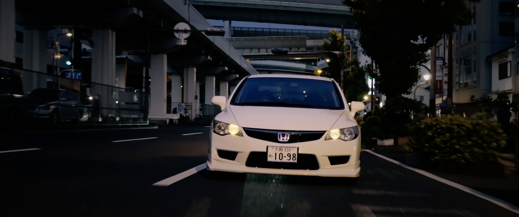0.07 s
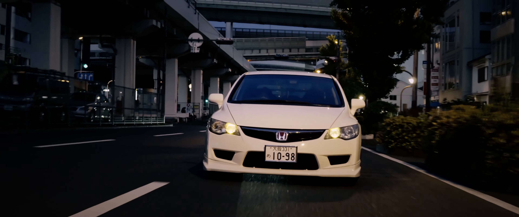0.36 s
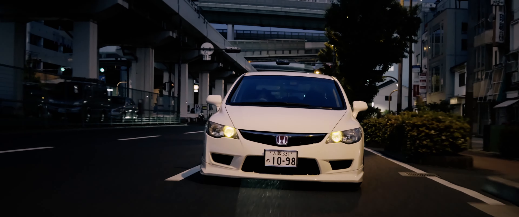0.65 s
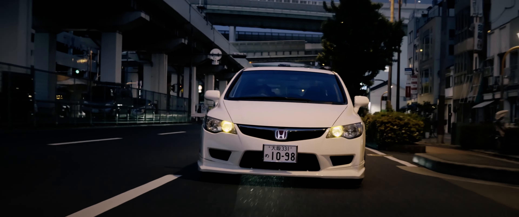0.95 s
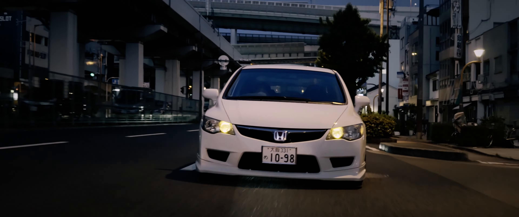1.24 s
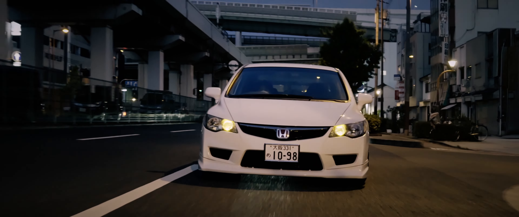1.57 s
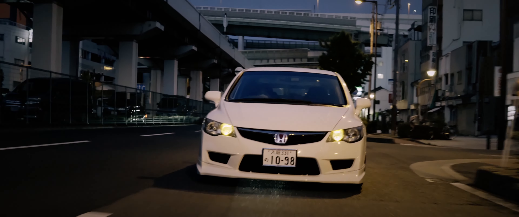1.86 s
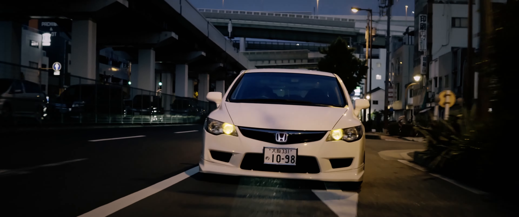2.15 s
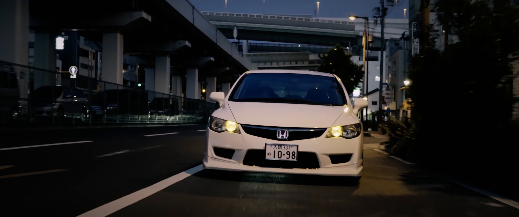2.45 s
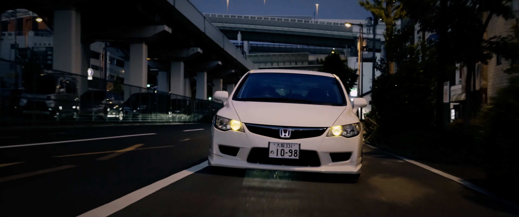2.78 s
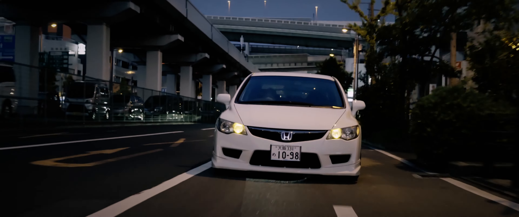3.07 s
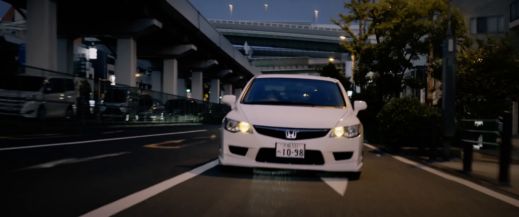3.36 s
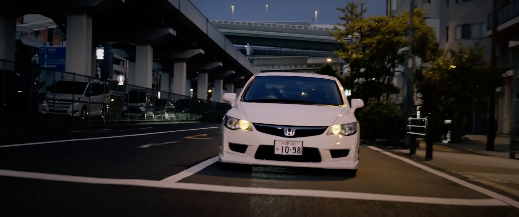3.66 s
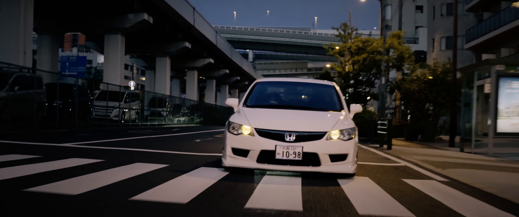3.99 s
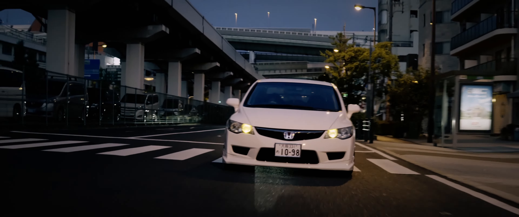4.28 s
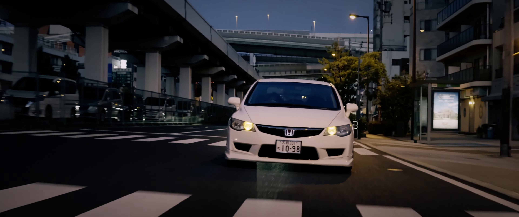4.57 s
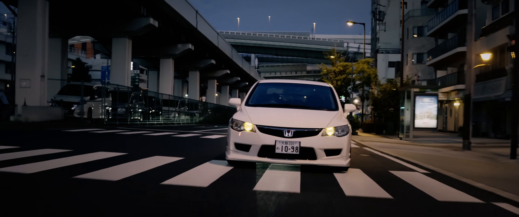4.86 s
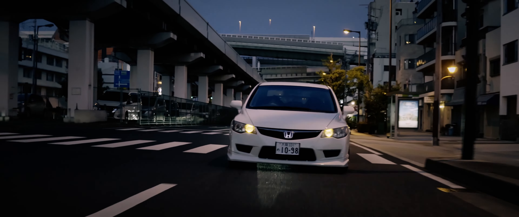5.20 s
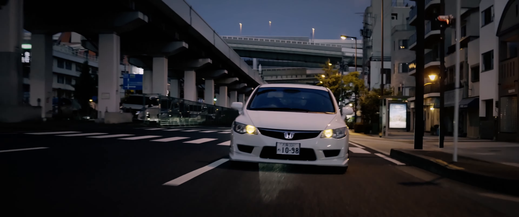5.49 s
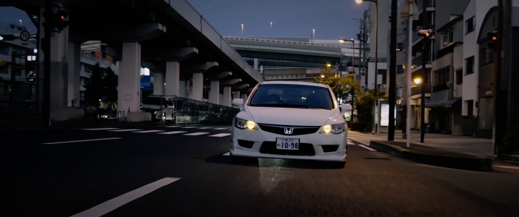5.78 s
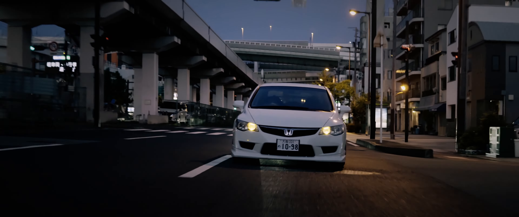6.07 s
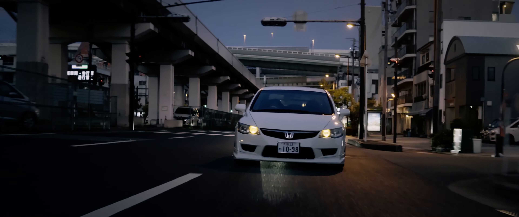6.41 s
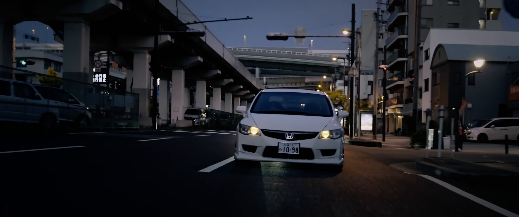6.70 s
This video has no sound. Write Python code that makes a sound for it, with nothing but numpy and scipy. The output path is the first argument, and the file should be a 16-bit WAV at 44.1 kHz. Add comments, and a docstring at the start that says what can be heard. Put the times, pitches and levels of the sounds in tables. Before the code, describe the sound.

Tyres roar dully on a city street while a car engine drones at high revs with whining gears, picked up inside the cabin. The driver lifts off and shifts up with a clack and a soft thud. The engine pulls again on a deeper, slightly raspy note before relaxing into a quieter cruise. A bump brings a deep thump, knocks and a brief rattle of trim, and the steady drone carries on.

```python
"""A four-cylinder engine booms at high revs under a gear whine, heard inside a sports car in the city.
It lifts off, shifts up, pulls again and settles to a cruise. Crank orders sweep through exhaust and
cabin resonances; gas noise puffs at each firing. The gear lever clacks, loose trim rattles and the
wheels thump over a bump. Tyre roar comes through the body throughout."""
import sys
import numpy as np
from scipy import signal
from scipy.fft import rfft, irfft, next_fast_len
from scipy.io import wavfile
from scipy.ndimage import map_coordinates

SR = 44100
rng = np.random.default_rng(int(sys.argv[2]) if len(sys.argv) > 2 else 0)


def output_pcm(signal):
    """Save a mono or channel-first signal as 16-bit PCM at the path in sys.argv[1].

    Samples are clipped to [-1, 1] before scaling.
    """
    pcm = np.clip(np.atleast_2d(signal).T, -1, 1) * 32767
    wavfile.write(sys.argv[1], SR, np.round(pcm).astype(np.int16))


N = 297234
TIME = np.arange(N) / SR

# high revs, sag with the clutch open, next gear, pull, cruise: t/s, crank speed/Hz
CRANK_SPEED = [(0, 112.0), (.64, 111.9), (.9, 109.2), (1.1, 105.5), (1.3, 99.4), (1.48, 97.3), (1.52, 75.5),
               (1.61, 87.5), (1.68, 82.3), (2.6, 88.4), (3.3, 90.0), (3.9, 90.1), (4.6, 88.6), (6.0, 87.8),
               (6.74, 88.4)]
# accelerator moves: t/s, load/dB, brightness/(dB/octave)
PEDAL_MOVES = [(0, -1.46, 0.1), (.57, -8, -0.5), (0.929, -7, -8), (1.27, -16.5, 1.5), (1.56, -1.1, .5),
               (2.1, -1, 3.5), (2.74, -7.5, 3.5), (3.08, -9, 1), (3.6, -13.5, -5.5), (4.85, -11.5, -5),
               (6.3, -8.5, 0.5)]
# exhaust and cabin response to one order at full load: f/Hz, level/dB
BOOM_RESPONSE = [(140, -37), (168, -31.5), (180, -24), (205, -20.5), (224, -15), (250, -15), (263, -22),
                 (295, -25), (335, -16), (352, -19.5), (366, -30), (394, -20.5), (416, -22), (438, -28),
                 (451, -27.5), (480, -31.5), (515, -37), (534, -26), (560, -36), (588, -31.5), (630, -45.5)]
# weaker response above the boom: f/Hz, level/dB
SNARL_RESPONSE = [(675, -46.5), (720, -54), (755, -42.5), (790, -57.5), (835, -53), (890, -49.5),
                  (930, -59), (970, -50.5), (1040, -62), (1190, -51.5), (1450, -74.5), (1630, -64.5),
                  (1900, -72.5), (2900, -81)]
# cabin standing waves: f/Hz, left minus right/dB, left lead/rad
STANDING_WAVES = [(90, -11, .1), (112, -3, .2), (175, -4, 0), (224, -1, .3), (252, -3, .2), (266, 4, -.6),
                  (330, -9, 1), (355, -5, .8), (420, -6, -.8), (438, -1, -1.6), (450, -10, -.6),
                  (530, -11, .2), (615, 4, -.5), (900, -1, .1)]
# combustion noise: f/Hz, relative density/dB
RASP_SPECTRUM = [(120, -24), (230, 3.5), (300, -4.5), (390, 9.5), (470, -11.5), (580, -3), (700, -20),
                 (1150, -17), (1500, -30), (2400, -37), (3300, -49.5), (4000, -51), (7500, -63.5),
                 (15000, -76.5)]
# gear mesh tones: crank order, relative level/dB
MESH_TONES = [(10, -48.5), (12, -61.5), (16, -71), (18, -59.5), (22, -75), (36, -83), (42, -88),
              (57, -87.5)]
# gear mesh hiss: f/Hz, relative density/dB
MESH_SPECTRUM = [(1200, -14), (2500, 4), (3300, -1.5), (4000, 3), (4600, -8.5), (6500, -14.5), (9000, -21)]
# swells of the whine: t/s, half length/s, lift/dB
WHINE_SWELLS = [(.19, 0.037, 6.5), (.5, .055, 8.5)]
# body jolts from the shift and the bump: t/s, level/dB, f/Hz, t60/s
BODY_JOLTS = [(1.013, -4.5, 219, 0.14), (1.312, -15, 198, 0.074), (4.349, -24, 45.2, 0.34),
              (4.462, -12, 62.6, 0.1), (4.513, 6, 73.4, 0.094)]
# bright clicks, loudest from the gear lever: t/s, level/dB, t60/s
CLICK_HITS = [(.9015, -54, 0.037), (.971, -53, 0.072), (1.02, -51.5, 0.092), (1.0375, -39.5, 0.085),
              (1.7506, -52, .025), (3.2023, -68, 0.04), (3.7884, -66, 0.069), (6.3162, -56, .06)]
# clicks: f/Hz, relative density/dB
CLICK_SPECTRUM = [(500, -3.5), (1800, 8), (3500, -4), (6000, -1), (9500, 0), (13000, -5.5), (16000, -10)]
# knocks through floor and lever housing: t/s, level/dB, t60/s
KNOCK_HITS = [(.972, -43, 0.14), (1.021, -38, 0.061), (4.33, -38, 0.19), (4.385, -35.5, .1),
              (4.475, -39.5, 0.29), (4.555, -33.5, 0.17)]
# knocks: f/Hz, relative density/dB
KNOCK_SPECTRUM = [(200, -9.5), (600, 9), (1150, 4), (1700, -18), (2600, -15), (5000, -49), (15000, -59.5)]
# trim shaken by shift and road: t/s, level/dB, t60/s
TRIM_HITS = [(.972, -48.5, 0.092), (1.021, -43, 0.11), (1.2921, -55, .1), (3.7884, -55, 0.062),
             (4.3272, -52.5, .16), (4.387, -40.5, 0.084), (4.467, -50.5, .25), (4.497, -51.5, 0.14),
             (4.555, -54.5, 0.2)]
# trim: f/Hz, relative density/dB
TRIM_SPECTRUM = [(300, -10.5), (1100, 5.5), (2000, 7), (3600, -1), (4900, -6.5), (6000, -13),
                 (11000, -15.5), (15000, -27.5)]
# tyre roar through the body: f/Hz, relative density/dB
TYRE_SPECTRUM = [(20, -21), (45, -14.5), (75, -10), (125, -20), (200, -8), (290, -16), (450, -21),
                 (590, -17), (690, -31.5), (1150, -32), (1500, -40), (2300, -45.5), (4500, -69.5),
                 (9000, -76), (15000, -88)]
# tyre cavity and cabin air modes: f/Hz, width/Hz, base lift/dB
AIR_MODES = [(180.9, 9.1, 5.5), (211.1, 52, 8), (353, 26, 3), (379, 63, 8), (496, 75, 1)]
# rough asphalt: t/s, half length/s, rumble lift/dB
ROUGH_PATCHES = [(3.38, .14, 6), (4.48, 0.21, 10)]
# cabin noise: f/Hz, left-right coherence
NOISE_COHERENCE = [(50, 0.72), (180, .8), (300, 0.44), (520, 0.3), (890, .8), (2600, 0.6), (10000, 0.76)]
# cabin noise: f/Hz, left minus right/dB
NOISE_BALANCE = [(30, 0.5), (70, -8), (140, -3.5), (210, -3), (400, -2), (740, -2), (3000, 1)]


def engine_orders(angle, lags, shake_db=-29, uneven_db=-19, count=44, decimation=7):
    """Half multiples of the crank speed sweep through exhaust and cabin resonances."""
    t, angle = TIME[::decimation], angle[::decimation]
    load_db, tilt_db_per_oct = pedal(t)
    speed_hz = crank_hz(t)
    out = np.zeros((2, len(t)))
    for half_orders in range(2, count + 1):
        order = half_orders / 2
        hz = order * speed_hz
        octaves = np.log2(hz / 300)
        db = at_hz(BOOM_RESPONSE + SNARL_RESPONSE, hz) + load_db
        db += tilt_db_per_oct * np.clip(octaves, -1, 1)
        if order == 1:  # crank imbalance, little load dependence
            db = shake_db + .35 * load_db
        if half_orders % 2:  # unequal cylinders
            db += np.minimum(uneven_db + 6 * octaves, 0)
        balance_db, lead_rad = at_hz(STANDING_WAVES, hz)
        pan = amp([balance_db, -balance_db]) ** .5
        pan /= np.linalg.norm(pan, axis=0)
        # firings vary, most at high orders and closed throttle
        roughness = .013 + .016 * order - .012 * load_db
        scatter = 1 + roughness * (wobble(28, t) + 1j * wobble(28, t))
        phase = order * angle + lags[half_orders] + np.outer([.5, -.5], lead_rad)
        out += 2 * amp(db) * pan * (scatter * np.exp(1j * phase)).real
    return signal.resample_poly(out, decimation, 1, axis=1, window="blackman")[:, :N]


def crank_hz(t=TIME):
    """Crank turns per second."""
    return np.interp(t, *np.transpose(CRANK_SPEED))


def crank_angle(waver=.00048):
    """Crank angle in rad; the speed is never quite steady."""
    return 2 * np.pi * np.cumsum(crank_hz() * (1 + waver * wobble(14))) / SR


def pedal(t=TIME, load_ramp_s=.1, bright_ramp_s=.22):
    """Load/dB and brightness/(dB/octave) ramp to each pedal position and hold."""
    start_s, load_db, tilt_db_per_oct = np.transpose(PEDAL_MOVES)

    def follow(targets, ramp_s):
        moves = zip(start_s[1:], np.diff(targets))
        return targets[0] + sum(step * np.clip((t - s) / ramp_s, 0, 1) for s, step in moves)
    return 20 * np.log10(follow(amp(load_db), load_ramp_s)), follow(tilt_db_per_oct, bright_ramp_s)


def engine_rasp(angle, level_db=-28, depth=.62, sputter_db=2):
    """Gas noise puffs twice a turn, unevenly, and grows with load."""
    speed_hz = crank_hz()
    load_db, tilt_db_per_oct = pedal()
    firing = (1 + depth * np.cos(2 * angle)) * amp(sputter_db * wobble(120))
    puffs = unit(firing * cabin_noise(RASP_SPECTRUM))
    lugging_db = -.15 * (speed_hz - np.mean(speed_hz))  # charges burn harder at low revs
    return amp(level_db + load_db + .5 * tilt_db_per_oct + lugging_db) * puffs


def lift_ring(angle, centre_s=2.82, half_s=.14, level_db=-46, order=10):
    """One high order rings briefly as the pedal eases after the pull."""
    return np.sqrt(2) * amp(level_db) * bell(centre_s, half_s) * np.cos(order * angle)


def gear_whine(angle, lags, level_db=-2.5, end_s=.54, fade_db_per_s=90, waver_db=2):
    """The lower gear's teeth sing and hiss until the throttle closes."""
    whine_db = level_db + humps_db(WHINE_SWELLS) - fade_db_per_s * np.maximum(TIME - end_s, 0)
    tones = sum(amp(db + waver_db * wobble(24)) * np.cos(order * angle + lags[2 * round(order)])
                for order, db in MESH_TONES)
    hiss = amp(-66 + np.minimum(whine_db, -2)) * cabin_noise(MESH_SPECTRUM)
    return np.sqrt(2) * amp(whine_db) * tones + hiss


def body_thumps(attack_s=.027):
    """Each jolt rings a low body mode, louder on the right."""
    out = np.zeros(N)
    for start_s, db, hz, t60_s in BODY_JOLTS:
        t = np.maximum(TIME - start_s, 0)
        envelope = amp(db - 60 * t / t60_s) * (1 - np.exp(-t / attack_s))
        out += envelope * np.sin(2 * np.pi * hz * t)
    return out * amp([[-2], [2]])


def contacts(hits, spectrum, grain_db, attack_s, tail_db, tail_t60_s=.29):
    """Parts collide: each hit is a fast-dying burst of noise with a faint tail."""
    envelope = np.zeros(N)
    t = TIME[:SR // 2]
    for start_s, db, t60_s in hits:
        span = envelope[round(start_s * SR):][:len(t)]
        decay = amp(-60 * t / t60_s) + amp(tail_db - 60 * t / tail_t60_s)
        burst = amp(db) * decay * (1 - np.exp(-t / attack_s))
        span += burst[:len(span)]
    chatter = unit(amp(grain_db * wobble(450)))
    return envelope * chatter * cabin_noise(spectrum)


def trim_rattle(rock_start_s=4.605, rock_period_s=.134):
    """Trim strikes when shaken, on each rock of the body after the bump, and faintly at random."""
    rocking = [(rock_start_s + k * rock_period_s, -58 - .5 * k, .12) for k in range(5)]
    stray = [(when * TIME[-1], -65 + 4 * size, .09) for when, size in rng.random((5, 2))]
    return contacts(TRIM_HITS + rocking + stray, TRIM_SPECTRUM, grain_db=0, attack_s=.00089, tail_db=-20)


def trim_buzz(centre_s=4.49, half_s=.15, level_db=-59, grain_db=3):
    """Trim buzzes while the wheels cross the bump."""
    buzz = unit(amp(grain_db * wobble(300)) * cabin_noise(TRIM_SPECTRUM))
    return amp(level_db) * bell(centre_s, half_s) * buzz


def loose_ticks(level_db=-71, spread_db=2.5, t60_s=.035, count=60):
    """Road vibration makes small parts tick at random."""
    times_s = rng.uniform(0, TIME[-1], count)
    sizes = np.clip(rng.standard_normal(count), -2, 2)
    hits = [(s, level_db + spread_db * size, t60_s) for s, size in zip(times_s, sizes)]
    spectrum = [(1000, -13.5), (4000, 0), (9000, -.5), (15000, -9.5)]  # f/Hz, relative density/dB
    return contacts(hits, spectrum, grain_db=1.5, attack_s=.0006, tail_db=-15)


def tyre_roar(level_db=-25, smooth_rumble_db=-.24, flutter_db=1, mode_boost_db=2):
    """Tyre noise rings tyre cavities and cabin air; rough asphalt adds rumble."""
    def modes_db(hz):
        return sum((db + mode_boost_db) / (1 + (2 * (hz - centre_hz) / width_hz) ** 2)
                   for centre_hz, width_hz, db in AIR_MODES)
    roar = cabin_noise(TYRE_SPECTRUM, modes_db)
    rumble = filtered(roar, lambda hz: 1 / (1 + (hz / 130) ** 4))
    rumble_db = smooth_rumble_db + humps_db(ROUGH_PATCHES)
    return amp(level_db + flutter_db * wobble(10)) * (roar + (amp(rumble_db) - 1) * rumble)


def cabin_noise(spectrum, lift_db=lambda hz: 0):
    """Shaped stereo noise, rms 1, with the cabin's coherence and balance."""
    def response(hz):
        width_rad = np.arccos(np.clip(at_hz(NOISE_COHERENCE, hz), -1, 1)) / 2
        return amp(at_hz(spectrum, hz) + lift_db(hz)) * [np.cos(width_rad), np.sin(width_rad)]
    mid, side = filtered(rng.standard_normal((2, N)), response)
    stereo = np.array([mid + side, mid - side])
    return unit(filtered(stereo, lambda hz: amp(np.outer([.5, -.5], at_hz(NOISE_BALANCE, hz)))))


def amp(db):
    """dB to gain."""
    return 10 ** (np.asarray(db) / 20)


def unit(x):
    """Scale to rms 1."""
    return x / np.sqrt(np.mean(x ** 2) + 1e-20)


def at_hz(table, hz):
    """Table columns at hz, on a log axis."""
    knots_hz, *columns = np.transpose(table)
    return np.squeeze([np.interp(np.log(hz + 1), np.log(knots_hz + 1), c) for c in columns])


def wobble(rate_hz, t=TIME):
    """Smooth random curve, rate_hz knots a second."""
    return map_coordinates(rng.standard_normal(size=4096), [t * rate_hz], mode="mirror")


def bell(centre_s, half_s):
    """Gaussian swell, peak 1."""
    return np.exp(-((TIME - centre_s) / half_s) ** 2)


def humps_db(rows):
    """Sum of Gaussian swells in dB."""
    return sum(db * bell(centre_s, half_s) for centre_s, half_s, db in rows)


def filtered(x, response):
    """Apply the gain response(hz) by FFT."""
    size = next_fast_len(N + 8192)
    return irfft(rfft(x, size) * response(np.fft.rfftfreq(size, 1 / SR)), size)[..., :N]


def scene():
    """Engine, tyres and small noises sum in the cabin."""
    angle = crank_angle()
    lags = rng.uniform(0, 2 * np.pi, size=128)  # rad; each order has its own path to the cabin
    engine = engine_orders(angle, lags) + engine_rasp(angle) + lift_ring(angle)
    whine = gear_whine(angle, lags)
    clicks = contacts(CLICK_HITS, CLICK_SPECTRUM, grain_db=-1.5, attack_s=.00074, tail_db=-38)
    trim = trim_rattle() + loose_ticks()
    knocks = contacts(KNOCK_HITS, KNOCK_SPECTRUM, grain_db=0, attack_s=.0022, tail_db=-28.5)
    return engine + whine + body_thumps() + clicks + knocks + trim + tyre_roar() + trim_buzz()


def record(dry, top_hz=15750):
    """Brick-wall low-pass."""
    return filtered(dry, lambda hz: hz < top_hz)


dry = scene()
out = record(dry)
output_pcm(out)
```